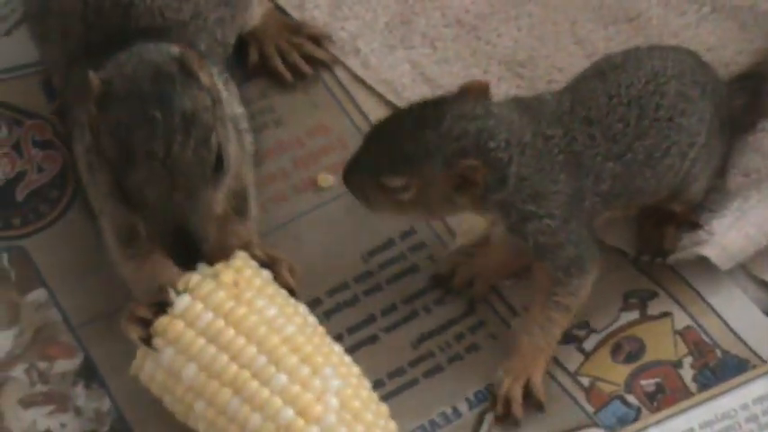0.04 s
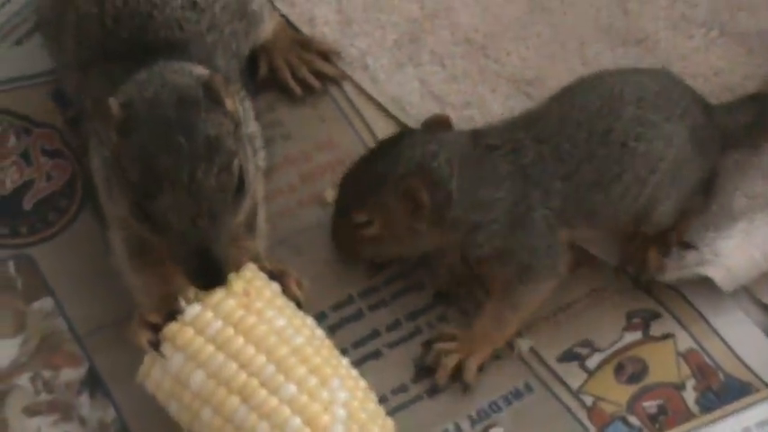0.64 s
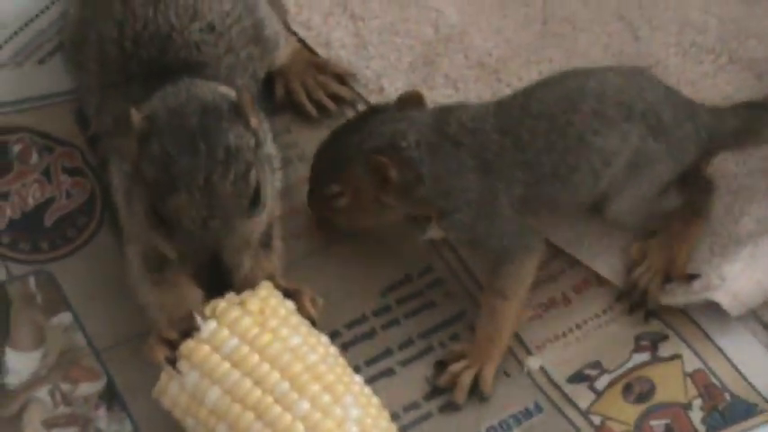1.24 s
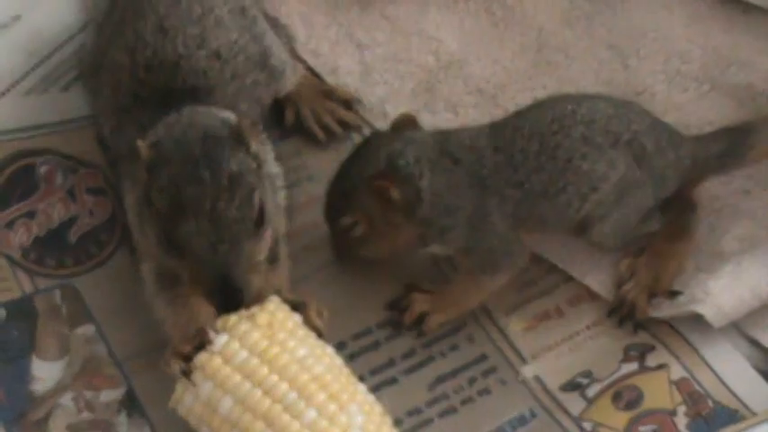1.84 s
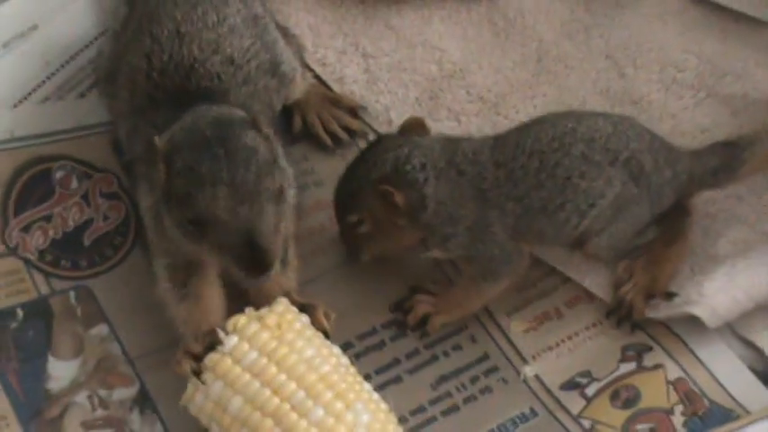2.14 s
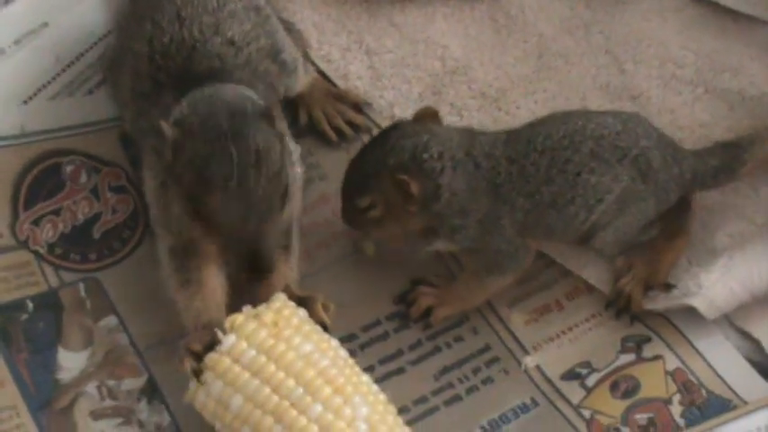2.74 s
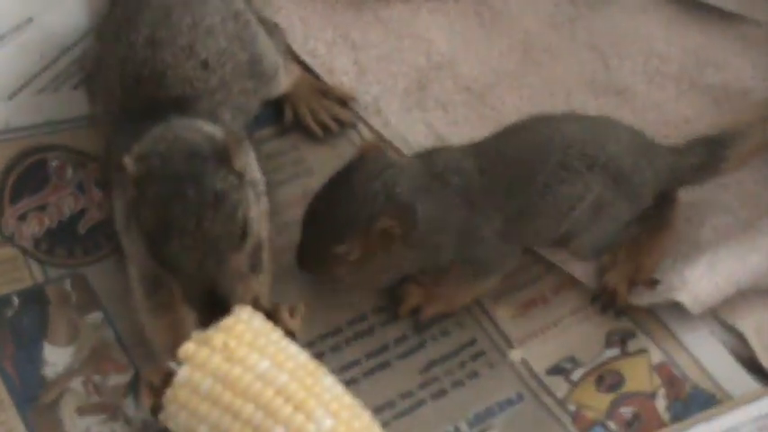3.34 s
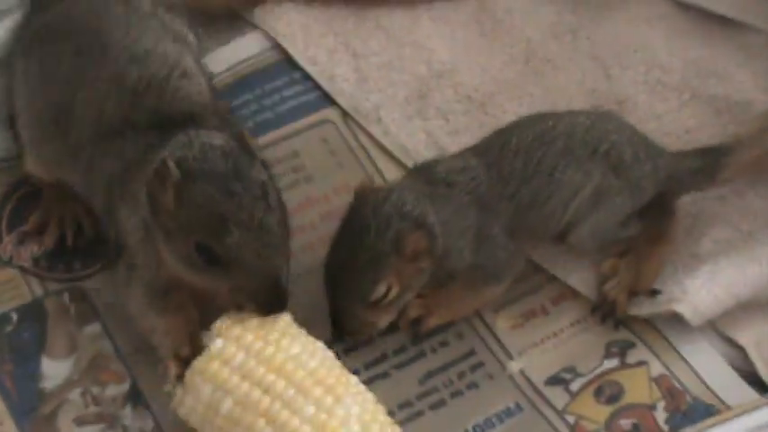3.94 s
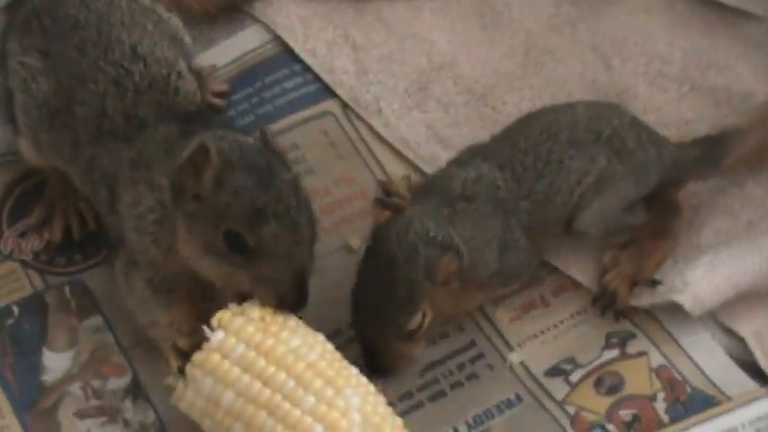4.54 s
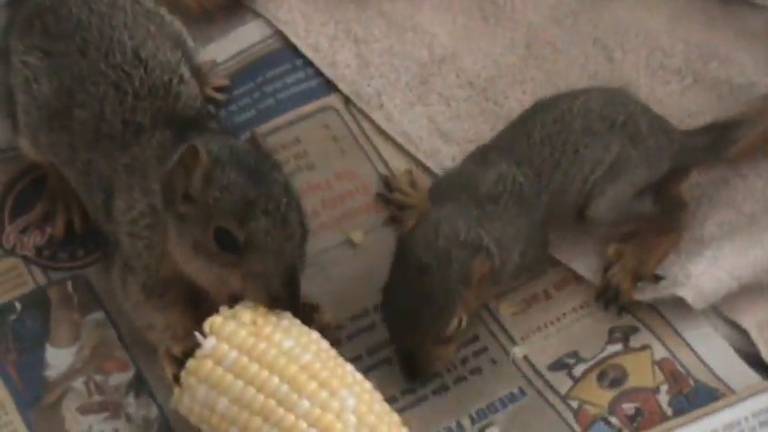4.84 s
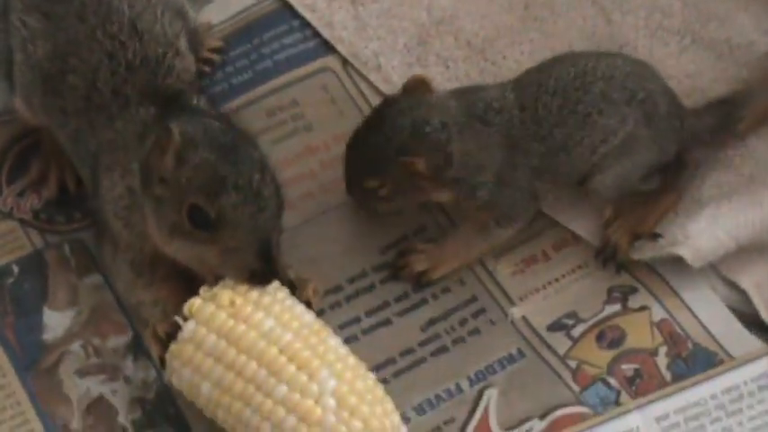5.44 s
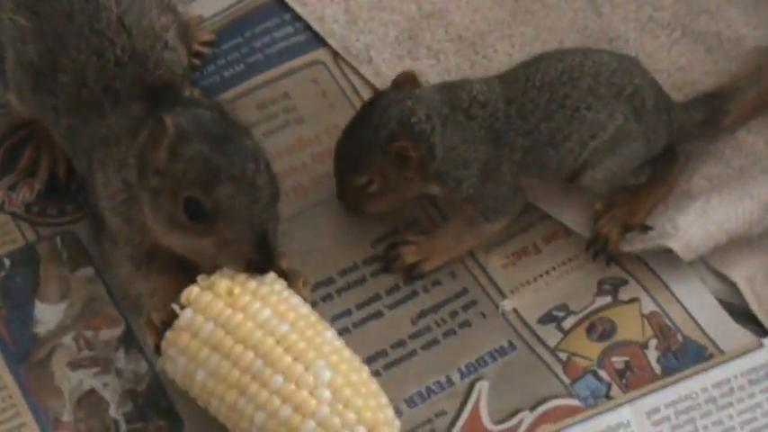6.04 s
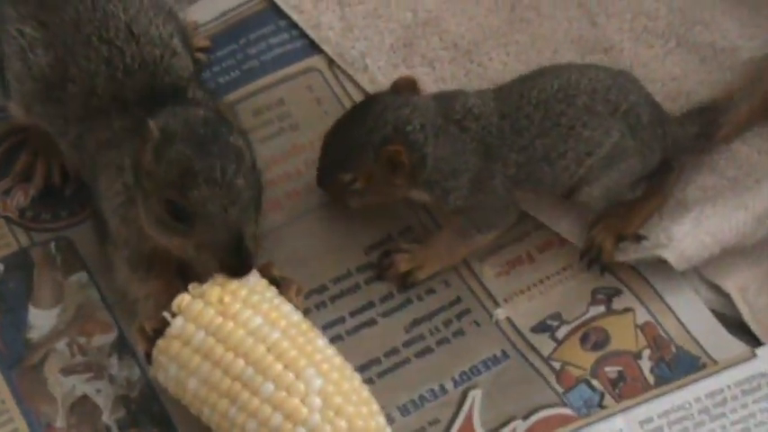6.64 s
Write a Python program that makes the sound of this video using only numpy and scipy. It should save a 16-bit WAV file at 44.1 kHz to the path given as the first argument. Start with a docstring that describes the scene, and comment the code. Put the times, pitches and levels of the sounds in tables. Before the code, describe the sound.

Young squirrels nibble corn with small clicks and rustle on newspaper, over room hiss and a hum that starts halfway.

```python
"""Two young squirrels feed on a corn cob on newspaper in a small room.
Teeth and claws click in sharp breaks; paws slide on the paper in tiny slips and bump the floor.
Close by, a camera's tape drive whines and its autofocus ticks, with a thin, very high whistle.
Halfway through, an appliance motor starts to hum over the room's rumble and hiss."""
import sys
import numpy as np
from scipy import signal
from scipy.fft import rfft, irfft, next_fast_len
from scipy.io import wavfile

SR = 44100
rng = np.random.default_rng(int(sys.argv[2]) if len(sys.argv) > 2 else 0)


def output_pcm(signal):
    """Save a mono or channel-first signal as 16-bit PCM at the path in sys.argv[1].

    Samples are clipped to [-1, 1] before scaling.
    """
    pcm = np.clip(np.atleast_2d(signal).T, -1, 1) * 32767
    wavfile.write(sys.argv[1], SR, np.round(pcm).astype(np.int16))


N = 295911

# room air and microphone hiss: freq_hz, relative_density_db, left_right_correlation
AIR_SPECTRUM = [(24.8, -3, .99), (60, 3, 0.99), (110, 5.5, 0.94), (198, 0.5, 0.63), (400, 0.5, 0.045),
                (610, -3, 0), (1120, -5.5, 0), (1540, -4, 0), (2680, -8.5, 0), (4460, -11, 0),
                (6700, -13.5, 0.49), (9900, -16, 0.48), (14600, -18, 0.57), (16700, -13.5, 0)]
# mains tone: pitch_hz, level_db
MAINS_TONES = [(59, -72.5)]
# tape motor tone, modulated by the turning head drum: sideband_number, level_db
DRIVE_SIDEBANDS = [(-4, -71), (-3, -67), (-2, -71), (-1, -71.5), (0, -62.5), (1, -71.5), (2, -73), (3, -67),
                   (4, -64.5), (5, -75.5), (6, -84.5), (8, -81), (13, -74.5), (15, -77)]
# other motor tones: pitch_hz, level_db
MOTOR_TONES = [(779.5, -73), (1378.6, -72)]
# line-scan whistle, modulated by the field rate: sideband_number, relative_db
WHISTLE_SIDEBANDS = [(-6, -28), (-5, -20), (-4, -25), (-3, -14), (-2, -22), (-1, 0.5), (0, 1)]
# focus motor runs: start_s, end_s, step_db
FOCUS_SPANS = [(0.75, 0.77, -43), (1.07, 1.09, -44), (2.42, 2.7, -49.5), (4.3, 6.5, -54.5)]
# focus motor resonances: pitch_hz, gain_db, t60_s
FOCUS_RESONANCES = [(1592, -3, 0.028), (1500, -22.5, 0.018), (2170, -7, 0.017)]
# lens resonances: pitch_hz, gain_db, t60_s
LENS_RESONANCES = [(2185, -7.5, 0.041), (2470, -23, .012), (3130, -9.5, 0.011), (5100, -8.5, 0.0066),
                   (6750, -21, 0.004)]
# near-wall reflections: delay_s, gain_db
WALL_ECHOES = [(0.0104, -16.5), (0.0158, -21)]
# floor resonances: pitch_hz, gain_db, t60_s
FLOOR_RESONANCES = [(173, -11, 0.11), (282, -21, 0.051), (329, -8.5, 0.058), (432, -6.5, 0.031),
                    (554, -13.5, 0.041), (680, -11, 0.013), (1180, -20, 0.0084)]
# soft bumps on the floor: start_s, strength_db
PAW_BUMPS = [(0.7163, -36.5), (3.1129, -44), (3.811, -22.5), (4.024, -43), (6.082, -45)]
# paper rustle: freq_hz, relative_density_db
PAPER_SPECTRUM = [(180, -9), (300, -6.5), (589, -10), (775, -2.5), (1050, -6.5), (1680, -8), (1970, -6),
                  (2800, -7), (4840, -5.5), (7010, -7), (9370, -10.5), (10700, -17), (14000, -24)]
# paws sliding on paper: centre_s, half_width_s, level_db, weight_db
PAW_SLIDES = [ (0.05, 0.068, -61.5, -17), (0.237, 0.051, -46.5, -8), (0.675, 0.058, -56.5, -2),
              (0.762, .014, -49.5, -6), (0.845, 0.026, -58, -1), (1.48, 0.085, -55, -13),
              (1.705, 0.029, -53.5, -5), (2.917, 0.027, -46, -1.5), (3.036, .048, -50, 0),
              (3.806, 0.022, -47.5, -0.5), (3.866, .029, -38, 3.5), (3.917, 0.016, -39.5, 7),
              (3.95, 0.043, -45.5, 1.5), (4.02, 0.044, -45, 2), (5.01, 0.023, -56.5, -1),
              (5.102, 0.033, -47, -1), (5.157, 0.01, -54.5, 8), (5.21, 0.016, -54.5, -3),
              (6.035, .028, -50.5, 3)]
# cob and paper resonances: centre_hz, width_hz, boost_db
COB_RESONANCES = [(710, 110, 4.5), (1250, 260, 1), (2560, 280, 0.5), (5100, 350, 1), (6830, 670, 5.5),
                  (9600, 900, 8)]
# teeth and claws on kernels and paper: start_s, strength_db, low_hz, high_hz, ring_hz
TOOTH_CLAW_CLICKS = [ (0.499, -39.5, 2200, 5560, 3660), (0.621, -30.5, 3600, 10000, 5800),
                     (0.665, -37.5, 2000, 4500, 3920), (0.844, -43, 1800, 6500, 5100),
                     (1.054, -41, 1500, 6000, 5030), (1.1917, -35, 3400, 4900, 3800),
                     (1.353, -39, 3200, 11000, 3000), (1.53, -38, 2800, 8000, 3230),
                     (1.57, -45, 3000, 4500, 3270), (1.7069, -31.5, 6400, 11000, 3170),
                     (1.722, -40.5, 3300, 5500, 3950), (1.931, -40.5, 3300, 8500, 4070),
                     (2.159, -43.5, 4000, 10000, 9180), (2.395, -42, 3000, 10500, 3450),
                     (2.9284, -27, 1680, 7050, 5160), (3.112, -19.5, 700, 5900, 4450),
                     (3.1844, -24.5, 3470, 10400, 5890), (3.9098, -24.5, 620, 2940, 800),
                     (3.9144, -23, 900, 5400, 2900), (3.9992, -28, 620, 7500, 5740),
                     (4.0242, -23.5, 1300, 11500, 4660), (5.058, -29, 1110, 6000, 5180),
                     (5.2032, -41.5, 3000, 4300, 3300), (5.2303, -36, 4000, 10000, 7700),
                     (5.283, -38.5, 2800, 10000, 3300), (6.082, -13, 780, 10500, 3000)]

FIELD_HZ = 59.94   # camera field rate
FFT_SIZE = next_fast_len(N)
BIN_HZ = np.fft.rfftfreq(FFT_SIZE, 1 / SR)


def from_db(db):
    """Decibels to gain."""
    return 10 ** (np.asarray(db) / 20)


def unit_rms(x):
    """Scale to rms 1."""
    return x / np.sqrt(np.mean(x ** 2) + 1e-20)


def seconds(size):
    """Time axis."""
    return np.arange(size) / SR


def add(track, start_s, sound):
    """Mix a sound in at start_s."""
    at = int(round(start_s * SR))
    track[..., at:at + sound.shape[-1]] += sound[..., :N - at]


def butter(x, hz, kind, order=2):
    """Butterworth filter."""
    sos = signal.butter(order, np.clip(hz, 10, .45 * SR), kind, fs=SR, output="sos")
    return signal.sosfilt(sos, x + 1e-18)


def per_bin(spectrum, column=1):
    """Table column at every FFT bin, interpolated in log frequency."""
    table = np.array(spectrum)
    return np.interp(np.log(np.maximum(BIN_HZ, 1)), np.log(table[:, 0]), table[:, column])


def below(corner_hz):
    """Low-pass gain per FFT bin."""
    return 1 / (1 + (BIN_HZ / corner_hz) ** 4)


def coloured(x, gain):
    """Apply a gain per FFT bin."""
    return irfft(rfft(x, FFT_SIZE) * gain, FFT_SIZE)[..., :N]


def drift(rate_hz):
    """Random motion between unit-normal knots."""
    knots = rng.standard_normal(N // 100)
    return np.interp(seconds(N) * rate_hz, np.arange(len(knots)), knots)


def stereo(mid, side):
    """Mid and side to left and right."""
    return np.array([mid + side, mid - side])


def pan(left_minus_right_db):
    """Left and right gains."""
    return from_db(np.array([[.5], [-.5]]) * left_minus_right_db)


def struck(hits, modes, vary_db):
    """Each hit (start_s, level_db) rings every mode with random strength."""
    out, t = np.zeros(N), seconds(SR // 8)
    hz, mode_db, t60_s = np.array(modes).T[:, :, None]
    for start_s, hit_db in hits:
        strength_db = hit_db + mode_db + vary_db * rng.standard_normal(hz.shape)
        partials = from_db(strength_db - 60 * t / t60_s) * np.sin(2 * np.pi * hz * t)
        add(out, start_s, partials.sum(axis=0))
    return out


def sidebands(carrier_hz, step_hz, rows):
    """Lines about a carrier: pitch_hz, level_db."""
    return [(carrier_hz + round(k) * step_hz, db) for k, db in rows]


def tones(lines, right_phase_rad, waver_rad, pan_db):
    """Steady machine tones with a shared phase waver."""
    t, out = seconds(N), np.zeros((2, N))
    waver = waver_rad * drift(rate_hz=4.38)
    for hz, level_db in lines:
        phase = 2 * np.pi * (hz * t + rng.random()) + waver
        out += np.sqrt(2) * from_db(level_db) * np.sin(phase + np.array([[0], [right_phase_rad]]))
    return out * pan(pan_db)


def air(level_db=-54.5):
    """Rumble common to both sides, hiss mostly separate."""
    gain, correlation = from_db(per_bin(AIR_SPECTRUM)), per_bin(AIR_SPECTRUM, column=2)
    mid = coloured(rng.standard_normal(N), gain * np.sqrt(1 + correlation))
    side = coloured(rng.standard_normal(N), gain * np.sqrt(1 - correlation))
    return from_db(level_db) * unit_rms(stereo(mid, side))


def mains():
    """Faint, wavering mains tone."""
    return tones(MAINS_TONES, right_phase_rad=0, waver_rad=.54, pan_db=1.5)


def appliance_hum(pitch_hz=119.3, start_s=3.31, attack_s=.11, base_db=-55, swell_db_per_s=.84,
                  dip_at_s=3.6, dip_s=.053):
    """A motor starts with a surge, dips once, then swells slowly; it hums near twice the mains rate."""
    t = seconds(N)
    attack = np.clip((t - start_s) / attack_s, 0, 1)
    surge_db = 3.5 * np.clip((dip_at_s - t) / dip_s, 0, 1)
    dip_db = 19 * np.exp(-((t - dip_at_s) / dip_s) ** 2)
    level_db = base_db + surge_db - dip_db + swell_db_per_s * (t - start_s) + .2 * drift(rate_hz=10)
    return np.sqrt(2) * attack * from_db(level_db) * np.sin(2 * np.pi * pitch_hz * t)


def tape_drive(whine_hz=964.3, drum_hz=30.03):
    """Motor whine with sidebands spaced at the head drum's rate."""
    lines = sidebands(whine_hz, drum_hz, DRIVE_SIDEBANDS) + list(MOTOR_TONES)
    return tones(lines, right_phase_rad=1.38, waver_rad=.12, pan_db=-2)


def high_whistle(pitch_hz=15734.3, base_db=-61, tremble_hz=13.7):
    """A thin, very high whistle, wavering in loudness with a quick tremble."""
    lines = sidebands(pitch_hz, FIELD_HZ, WHISTLE_SIDEBANDS)
    whistle = tones(lines, right_phase_rad=.24, waver_rad=.03, pan_db=-.2)
    waver_db = 2 * drift(rate_hz=2.85)
    tremble_db = 1.8 * np.sin(2 * np.pi * tremble_hz * seconds(N))
    return whistle * from_db(base_db + waver_db + tremble_db)


def focus_motor(delay_s=.008, uneven_db=5):
    """While running, the motor takes one uneven step per field."""
    times_s = np.arange(0, N / SR, 1 / FIELD_HZ) + delay_s
    offsets_db = uneven_db * np.minimum(rng.standard_normal(len(times_s)), 2)
    steps = [(s, step_db + db) for start_s, end_s, step_db in FOCUS_SPANS
             for s, db in zip(times_s, offsets_db) if start_s < s < end_s]
    return butter(struck(steps, FOCUS_RESONANCES, vary_db=3), 1180, "high")


def lens_ticks(start_s=4.4825, end_s=6.5, period_fields=8, strength_db=-42.5, rasp_s=.0032, rasp_db=-7.5):
    """Hunting for focus, the lens is nudged at an even pace: a ring and a tiny rasp each time."""
    t, rasp = seconds(SR // 50), np.zeros(N)
    times_s = np.arange(start_s, end_s, period_fields / FIELD_HZ)
    ticks = list(zip(times_s, strength_db + 2.5 * rng.standard_normal(len(times_s))))
    for s, tick_db in ticks:
        add(rasp, s, from_db(tick_db + rasp_db) * rng.standard_normal(len(t)) * np.exp(-t / rasp_s))
    return struck(ticks, LENS_RESONANCES, vary_db=2) + butter(rasp, [2600, 8000], "band")


def room(x, t60_s=.21, build_s=.0099, tail_db=-12, wall_cut_hz=8700, correlation=.66):
    """Direct sound, two wall echoes and a short diffuse tail."""
    t = seconds(SR // 2)
    mid, side = rng.standard_normal((2, len(t)))
    noise = stereo(np.sqrt(1 + correlation) * mid, np.sqrt(1 - correlation) * side)
    tail = butter(noise, wall_cut_hz, "low") * from_db(-60 * t / t60_s) * np.clip(t / build_s, 0, 1)
    response = from_db(tail_db) * unit_rms(tail) / np.sqrt(len(t))
    for delay_s, echo_db in WALL_ECHOES:
        response[:, int(delay_s * SR)] += from_db(echo_db)
    return x + signal.fftconvolve(x, response, axes=1)[:, :N]


def off_axis(x, lag_s=.00002, treble_pan_db=-2, treble_hz=6500):
    """The animals sit off axis: the right capsule hears them later and slightly brighter."""
    delay = np.exp(-2j * np.pi * BIN_HZ * np.array([[0], [lag_s]]))
    return coloured(x, pan(treble_pan_db * (1 - below(treble_hz))) * delay)


def paw_bumps(settle_s=.0025, loss_db=4.5, low_cut_hz=150, gain_db=2):
    """Padded weight settles on the floor in ever weaker, sparser knocks that radiate little bass."""
    touches = [(s + settle_s * k * k, db - loss_db * k) for s, db in PAW_BUMPS for k in range(5)]
    return from_db(gain_db) * butter(struck(touches, FLOOR_RESONANCES, vary_db=2.5), low_cut_hz, "high")


def sheet_shakes(delay_s=.017, half_width_s=.017, gain_db=-30, db_per_octave=-4):
    """Each listed click shakes the sheet, thin ones with less weight; rows as in PAW_SLIDES."""
    return [(s + delay_s, half_width_s, db + gain_db, 1.5 + db_per_octave * np.log2(low_hz / 700))
            for s, db, low_hz, _, _ in TOOTH_CLAW_CLICKS]


def paper_rustle(slips_per_s=8000, size_db=3, stick_db=2.26, sheet_hz=2000, crisp_hz=5300, top_hz=10700):
    """Claws catch on fibres in dense tiny slips; heavy paws drive the lows, light ones sound crisper."""
    t = seconds(N)
    sizes = from_db(size_db * np.minimum(rng.exponential(1, (2, N)), 4)) * rng.choice([-1, 1], (2, N))
    mid, side = sizes * (rng.random((2, N)) < slips_per_s / SR)
    slips = unit_rms(coloured(stereo(mid, .12 * side), from_db(per_bin(PAPER_SPECTRUM))))
    low, high = coloured(slips, below(sheet_hz)), coloured(slips, 1 - below(crisp_hz))
    bands = (low, slips - low - high, high)
    band_power = np.zeros((3, N))
    for strokes, crisp_db in ((PAW_SLIDES, -1), (sheet_shakes(), -7)):
        for s, half_s, level_db, weight_db in strokes:
            span = slice(max(int((s - 3 * half_s) * SR), 0), int((s + 3 * half_s) * SR))
            speed = np.exp(-((t[span] - s) / half_s) ** 2)
            band_db = np.array([[weight_db], [0], [crisp_db - .28 * weight_db]])
            band_power[:, span] += (from_db(level_db + band_db) * speed) ** 2
    rustle = sum(np.sqrt(power) * band for power, band in zip(band_power, bands))
    sticking = from_db(stick_db * drift(rate_hz=220))
    return butter(rustle * sticking, top_hz, "low", order=8)


def cob_body(x):
    """Each cob or paper resonance lifts a narrow band."""
    for hz, width_hz, boost_db in COB_RESONANCES:
        b, a = signal.iirpeak(hz, hz / width_hz, fs=SR)
        x = x + (from_db(boost_db) - 1) * signal.lfilter(b, a, x)
    return x


def nibbles(ticks_per_s=3.6, end_s=2.8, strength_db=-45.5, band_hz=(2800, 7500), ring_hz=3440):
    """Faint tooth ticks at random early moments; rows as in TOOTH_CLAW_CLICKS."""
    slots_s = seconds(N)[::1000]
    fires = (rng.random(len(slots_s)) < ticks_per_s * slots_s[1]) & (slots_s < end_s)
    offset_db = 2.5 * rng.standard_normal(len(slots_s))
    octaves = .2 * rng.standard_normal(len(slots_s))
    return [(slots_s[k], strength_db + offset_db[k], *band_hz, ring_hz * 2 ** octaves[k])
            for k in np.flatnonzero(fires)]


def clicks(gain_db=7, firm_db=-24, crumble_s=.0032, ring_t60_s=.006, ring_db=-3.5, delay_s=.0006):
    """Teeth and claws: a sharp break, brief crumbling and a tiny ring. Returns cracks, rings."""
    out, t = np.zeros((2, 2, N)), seconds(SR // 25)
    for start_s, strength_db, low_hz, high_hz, ring_hz in list(TOOTH_CLAW_CLICKS) + nibbles():
        hard_db = strength_db - firm_db
        mid, side = .17 * rng.standard_normal((2, len(t))) * np.exp(-t / crumble_s)
        force = cob_body(stereo(mid + (t == 0), .22 * side))
        dull_hz = 3400 * 2 ** (-.055 * hard_db)   # harder clicks bend more paper and sound deeper
        force = butter(force, dull_hz, "low", order=1)
        crack = unit_rms(butter(butter(force, low_hz, "high", order=3), high_hz, "low", order=6))
        ring = unit_rms(np.sin(2 * np.pi * ring_hz * t) * t * from_db(-60 * t / ring_t60_s))
        parts = unit_rms(np.array([crack, from_db(ring_db) * stereo(ring, 0)])) * np.sqrt(2 / len(t))
        gains = from_db(strength_db + gain_db) * pan(.6 + .09 * hard_db)   # harder: further left
        add(out, start_s + delay_s, parts * gains)
    return out


def scene():
    """Squirrels in the room, over the machines and the air."""
    cracks, rings = clicks()
    squirrels = room(cracks + paper_rustle() + paw_bumps()) + rings   # rings carry only at close range
    machines = mains() + tape_drive() + high_whistle() + lens_ticks() + focus_motor() + appliance_hum()
    return off_axis(squirrels) + machines + air()


def record(dry):
    """Steep low-pass at 16 kHz."""
    return signal.sosfilt(signal.ellip(12, .1, 80, 16000, fs=SR, output="sos"), dry)


dry = scene()
out = record(dry)
output_pcm(out)
```